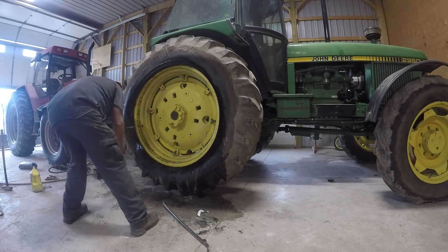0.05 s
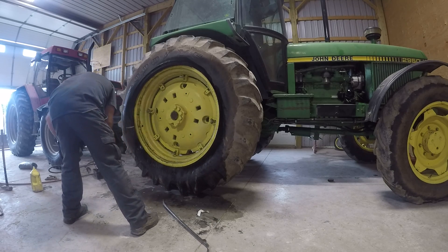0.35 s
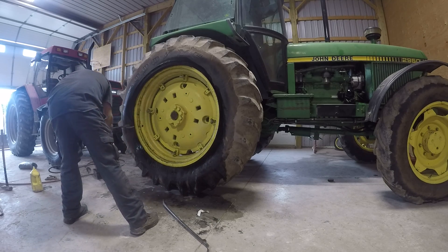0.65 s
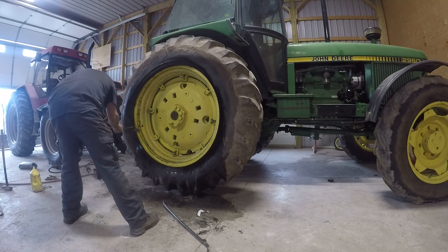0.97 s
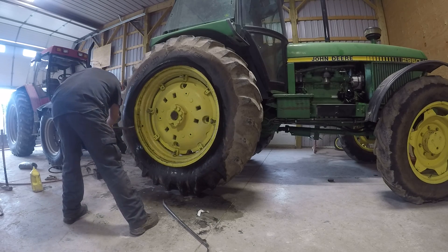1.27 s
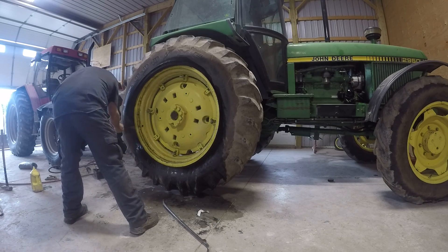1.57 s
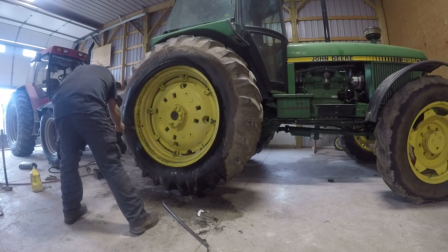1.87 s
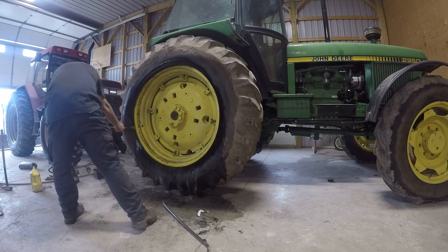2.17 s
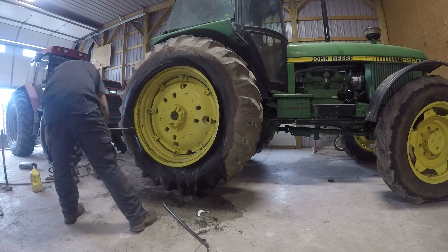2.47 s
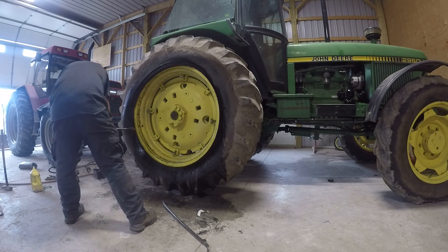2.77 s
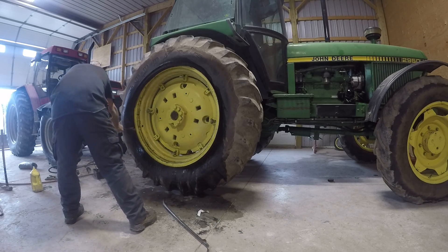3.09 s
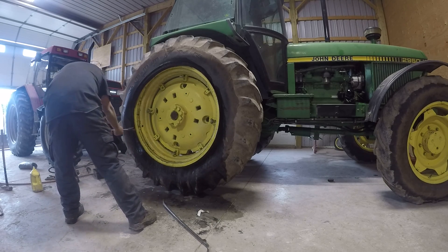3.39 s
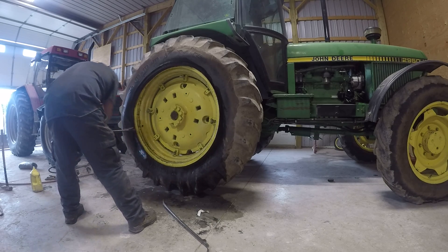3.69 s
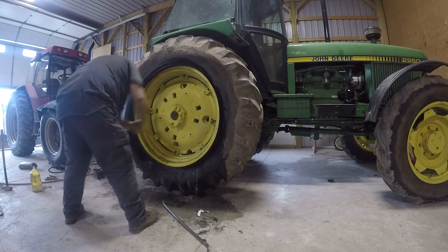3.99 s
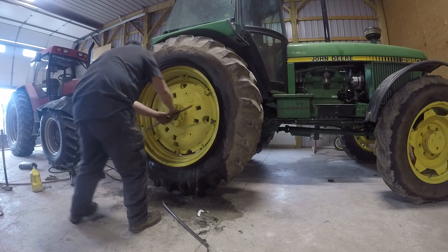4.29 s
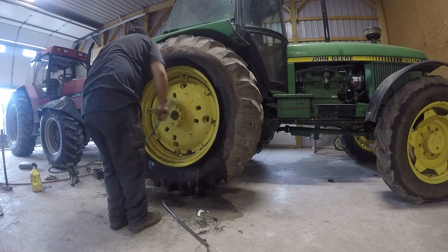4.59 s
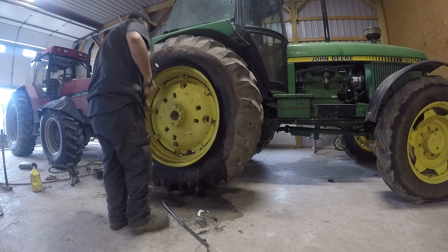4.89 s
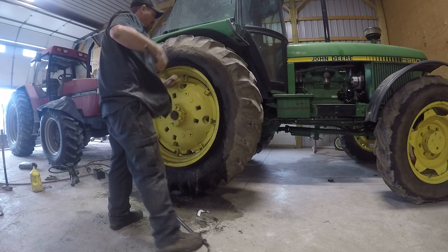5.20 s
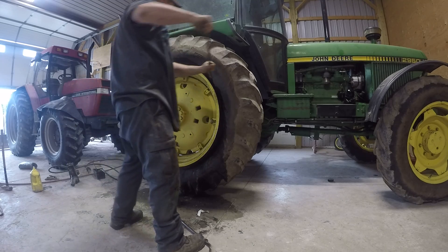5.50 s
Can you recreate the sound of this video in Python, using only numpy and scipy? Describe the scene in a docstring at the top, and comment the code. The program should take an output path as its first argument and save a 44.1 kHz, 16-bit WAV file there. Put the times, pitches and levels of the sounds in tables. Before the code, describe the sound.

In an echoing workshop, a steady hollow hiss, a low motor hum and a soft fluttering tick lie behind work on a tractor wheel. One microphone picks up three short clanks of a steel bar on the rim, each leaving a faint ring. The bar then touches and drags lightly along the metal, comes loose with a clear ringing note, and gives a final small clink.

```python
"""One microphone in a sheet-metal workshop, a steel bar at work on a tractor's wheel rim.
The bar knocks and rings; the tyre damps the rim, so each knock is a short clank the hall carries on.
Further back, a hollow hiss and a low motor hum run throughout, with a soft electrical ticking.
More knocks come near 0.9 s and 1.5 s, then light clinks and scrapes from 2 s on.
At 4.3 s the bar comes free and rings out, and a last clink and faint scrapes follow."""
import sys
import numpy as np
from scipy import signal
from scipy.fft import rfft, irfft
from scipy.io import wavfile
from scipy.ndimage import uniform_filter1d

SR = 44100
rng = np.random.default_rng(int(sys.argv[2]) if len(sys.argv) > 2 else 0)


def master(y):
    """Save y as 16-bit WAV."""
    cut = np.clip(np.atleast_2d(y).T, -1, 1)
    pcm = np.round(cut * 32767)  # scale
    wavfile.write(sys.argv[1], SR, pcm.astype(np.int16))


N = 249165
T = np.arange(N) / SR
HZ = np.fft.rfftfreq(N, 1 / SR)

# the rim's strong modes: pitch_hz, width_hz, lift_db
RIM_MODES = [(160, 28, 15.5), (236, 15, 17), (555, 28, 12.5), (650, 14, 21.5), (993, 46, 15),
             (1270, 25, 12), (1553, 51, 16.5), (2200, 120, 8.5), (2550, 51, 13), (2590, 7.8, 8.5),
             (2732, 47, 10), (2894, 22, 8), (3230, 23, 0), (3234, 72, 10.5), (3350, 72, 8), (3690, 230, 5),
             (4430, 140, 7.5), (4830, 130, 9), (4980, 57, 9), (4960, 70, 2), (5930, 80, 5), (6170, 31, -27),
             (6740, 44, 10.5), (6680, 100, 10), (8450, 73, -28), (9560, 51, 10), (12300, 91, 7)]
# the dense weak modes between them: frequency_hz, relative_db
RIM_SPECTRUM = [(40, -24), (130, -17), (250, -17.5), (420, -16.5), (800, -7.5), (1400, -4), (2300, 4),
                (3400, -0.5), (4100, -6), (5500, -9), (7000, -16), (7500, -22), (11000, -33.5),
                (15500, -43)]
# the hall's reverberation time: frequency_hz, t60_s
HALL_DECAY = [(100, 0.84), (500, 1.29), (1200, 1.11), (2500, 1.135), (4000, 0.97), (7000, 0.93),
              (11000, 0.82), (16000, 1)]
# the low rumble of the motor and of the shaken wheel: frequency_hz, relative_db
RUMBLE_SPECTRUM = [(10, -21), (30, 10.5), (60, 5), (110, -4), (180, -6), (215, -3), (248, -7.5), (275, -5),
                   (350, -13), (500, -18.5), (1000, -89)]


def amp(db):
    """Decibels to gain."""
    return 10 ** (np.asarray(db) / 20)


def unit_rms(x):
    """Scales to rms 1."""
    return x / np.sqrt(np.mean(abs(x) ** 2) + 1e-20)


def curve_at(points, hz):
    """Reads a table on a log-frequency axis."""
    point_hz, value = np.transpose(points)
    return np.interp(np.log(hz + 1), np.log(point_hz + 1), value)


def add(mix, start_s, sound):
    """Mixes a sound in at start_s, which may lie before zero."""
    at = round(start_s * SR)
    sound = sound[max(-at, 0):]
    part = mix[max(at, 0):][:len(sound)]
    part += sound[:len(part)]


def resonant_gain(spectrum, modes, hz):
    """Gain of a broad spectrum with resonances standing out of it."""
    lift = sum((amp(lift_db) ** 2 - 1) / (1 + (2 * (hz - pitch_hz) / width_hz) ** 2) ** 1.05
               for pitch_hz, width_hz, lift_db in modes)
    return amp(curve_at(spectrum, hz)) * np.sqrt(np.maximum(1 + lift, 0.1))


def noise(gain):
    """Steady noise of rms 1, coloured by a gain curve."""
    return unit_rms(irfft(rfft(rng.standard_normal(N)) * gain, N))


def drift(rate_hz):
    """Slow random motion of rms 1."""
    return noise(np.exp(-(HZ / rate_hz) ** 2))


def minimum_phase(gain):
    """The minimum-phase impulse response of a gain curve."""
    log_gain = np.log(np.maximum(np.r_[gain, gain[-2:0:-1]], 1e-5))
    return np.fft.ifft(np.exp(np.conj(signal.hilbert(log_gain)))).real


def bar_ring(beat_hz=16, strike_rise_s=0.0047, linger_rise_s=0.0092):
    """The bar rings in clean modes; the hall holds each one on, beating as the bar is swung."""
    # jolts to the bar, the last as it slips off the rim: start_s, gain_db
    jolts = [(-0.08, -3.5), (1.485, -11.5), (4.308, -0.5)]
    # the free bar's modes: pitch_hz, strike_db, t60_s, linger_db
    bar_modes = [(1272, -42.5, 0.38, -52), (1550, -44, 0.49, -50), (1703, -32.5, 0.25, -44),
                 (2024, -50, 0.39, -46), (2356, -29.5, 0.3, -38), (2746, -36, 0.26, -60),
                 (3150, -38, .25, -43), (3776, -34, 0.75, -37.5), (3920, -44, 0.43, -38),
                 (4452, -36, 0.12, -56), (4856, -43, .25, -49), (5845, -25, 0.11, -46),
                 (6923, -38, 0.2, -50.5), (7570, -60, .2, -62), (8150, -44, 0.13, -68),
                 (9388, -56, 0.27, -63), (11210, -45, .13, -66)]
    t, out = np.arange(SR) / SR, np.zeros(N)
    coarse_t = t[::20]
    for start_s, gain_db in jolts:
        for hz, strike_db, t60_s, linger_db in bar_modes:
            strike = amp(strike_db - 60 * t / t60_s) * (1 - np.exp(-t / strike_rise_s))
            linger = amp(linger_db - 60 * t / curve_at(HALL_DECAY, hz))
            linger *= 1 - np.exp(-t / linger_rise_s)
            detune, phase = np.hsplit(rng.standard_normal((12, 2)), 2)  # twelve echo paths
            paths = np.exp(2j * np.pi * (beat_hz * detune * coarse_t + phase))
            echoes = np.interp(t, coarse_t, paths.sum(0))
            echoes /= np.sqrt(abs(echoes) + 0.1)  # keeps the beats shallow
            echoes /= np.sqrt(np.mean(abs(echoes[:SR // 5]) ** 2))
            mode = (strike + linger * echoes) * np.exp(2j * np.pi * hz * t)
            add(out, start_s, amp(gain_db) * mode.imag)
    return out


def knocks(spot_damping=0.077, spot_db=9.5, crack_db=-26):
    """Blows of the bar on the rim, some dull and some bright, each with a short crack."""
    # bar on rim: start_s, level_db, bass_db, treble_db, clatter_t60_s, mode_share (0-1),
    # spot_low_hz, spot_high_hz (the pitches that the struck spot favours)
    blows = [(-0.06, -14, -1.5, 0, 0.039, 0.3, 1730, 2160), (-0.03, -23.5, 0.5, 7, 0.083, 0.45, 684, 3650),
             (0.8697, -25, -2, -5.5, 0.034, 0.15, 3740, 3950),
             (0.874, -27, 5, -14, 0.072, 0.51, 1290, 2050), (0.888, -33.5, 13, -21, 0.062, 0.71, 580, 615),
             (0.9623, -33, 2, 4.5, 0.035, 0.53, 4150, 6300), (0.975, -32, 1.5, -14, 0.16, 0.47, 1510, 1830),
             (0.985, -31.5, -1, 3, 0.065, 0.22, 4000, 4890),
             (1.475, -25, -12, -3.5, 0.048, 0.71, 1220, 6460), (1.479, -25.5, -10, 0, 0.021, 1, 1570, 2500),
             (1.4843, -18, -16.5, 7.5, 0.03, 0.98, 3340, 11500),
             (1.489, -22, 4, -6, 0.16, 0.96, 1330, 3060), (4.3036, -31.5, -3.5, 5, 0.04, 0.42, 4180, 5900),
             (4.309, -29, 0, 3.5, 0.083, 0.32, 1074, 2400)]
    out = np.zeros(N)
    for start_s, level_db, bass_db, treble_db, clatter_t60_s, mode_share, *spot_hz in blows:
        spot_modes = [(hz, spot_damping * hz, spot_db) for hz in spot_hz]
        add(out, start_s, rim_clank(level_db, bass_db, treble_db, clatter_t60_s, mode_share, spot_modes))
        add(out, start_s, crack(level_db + treble_db + crack_db))
    return out


def rim_clank(level_db, bass_db, treble_db, clatter_t60_s, mode_share, spot_modes):
    """One contact rings the damped rim, coloured by the struck spot, and the hall carries it on."""
    hz = np.fft.rfftfreq(8192, 1 / SR)
    bass_shelf = 1 / (1 + (hz / 1400) ** 6)
    treble_shelf = 1 - 1 / (1 + (hz / 4400) ** 14)
    # countless narrow modes of the steel ripple the treble
    ripple = unit_rms(uniform_filter1d(rng.standard_normal(len(hz)), size=10))
    colour_db = bass_db * bass_shelf + treble_db * treble_shelf + 5 * ripple * hz / (hz + 3500)
    modes = [(pitch_hz, width_hz, lift_db * mode_share) for pitch_hz, width_hz, lift_db in RIM_MODES]
    rim = resonant_gain(RIM_SPECTRUM, modes, hz)
    spot = resonant_gain([(1, 0)], spot_modes, hz)  # peaks on a flat spectrum
    ring = minimum_phase(rim * spot * amp(colour_db))
    # a longer clatter shakes more of the wheel and fills the hall more: 3 dB per doubling
    hall_db = -5.5 + 3 * np.log2(clatter_t60_s / 0.055)
    paths = amp(hall_db) * hall_tail()
    add(paths, 0, clatter(clatter_t60_s))
    gain = amp(level_db) * np.sqrt(0.01 * SR)  # the level is the blow's energy spread over 10 ms
    return gain * signal.fftconvolve(paths, ring / np.linalg.norm(ring))


def crack(level_db, t60_s=0.012, low_hz=5500):
    """The snap of steel on steel, before the rim rings: a few milliseconds of treble."""
    t = np.arange(SR // 20) / SR
    highpass = signal.butter(2, low_hz, "high", fs=SR, output="sos")
    snap = signal.sosfilt(highpass, rng.standard_normal(len(t)))
    return snap * amp(level_db - 60 * t / t60_s)


def clatter(t60_s, spread_s=0.0014, size=8192):
    """A contact and its close bounces between wheel, tyre and floor: a colourless burst."""
    t = np.arange(size) / SR
    rise = 1 - 0.52 * np.exp(-t / spread_s)  # the blow takes a moment to spread round the rim
    bounces = rng.standard_normal(size) * rise * amp(-60 * t / t60_s)
    power = uniform_filter1d(abs(rfft(bounces)) ** 2, size=61)
    whitener = minimum_phase(1 / np.sqrt(power))
    return signal.fftconvolve(bounces, whitener)[:size]


def hall_tail(build_s=0.018):
    """The workshop's diffuse echoes, of energy 1; the midrange lasts longest."""
    hz, frame_s, spectra = signal.stft(rng.standard_normal(2 * SR), SR, nperseg=256)
    decay = amp(-60 * frame_s / curve_at(HALL_DECAY, hz)[:, None])
    tail = signal.istft(spectra * decay, SR, nperseg=256)[1]
    t = np.arange(len(tail)) / SR
    tail *= 1 - np.exp(-(t / build_s) ** 2)
    return tail / np.linalg.norm(tail)


def wheel_drone(pitch_hz=145, t60_s=1.76, rise_s=0.0062, shudder_db=-6):
    """The wheel's lowest mode, which the tyre hardly damps, and a low shudder that dies with it."""
    # blows and shoves that shake the whole wheel: start_s, level_db
    shoves = [(-0.06, -46.5), (1.483, -58), (3.80, -56), (4.305, -56)]
    t, out = np.arange(2 * SR) / SR, np.zeros(N)
    for start_s, level_db in shoves:
        shudder = amp(shudder_db) * noise(amp(curve_at(RUMBLE_SPECTRUM, HZ)))[:len(t)]
        envelope = amp(level_db - 60 * t / t60_s) * (1 - np.exp(-t / rise_s))
        add(out, start_s, envelope * (np.sin(2 * np.pi * pitch_hz * t) + shudder))
    return out


def machinery(hiss_db=-50.5, rumble_db=-57):
    """Further back, a hollow hiss as of air in a hose, over a motor's rumble and wavering hum."""
    # the broad shape of the hiss: frequency_hz, relative_db
    hiss_spectrum = [(300, -15.5), (500, -9), (1200, -4), (1700, 4.5), (2500, 5), (3000, 2.5), (3800, 5),
                     (4100, -5), (4700, -5.5), (5500, -8.5), (6600, -13), (7200, -14), (10000, -20),
                     (15000, -21.5)]
    # its hollow resonances: pitch_hz, width_hz, lift_db
    hiss_modes = [(647, 270, 4), (998, 72, 8.6), (1550, 12, 4.7), (2114, 28, 15.6), (2251, 87, 11.9),
                  (3232, 60, 12.25), (3715, 11, 9.3), (4350, 38, 9.3), (4640, 80, 5.5), (5670, 51, 6.9),
                  (6480, 80, 6.2)]
    # the motor's tones: pitch_hz, level_db
    hum_tones = [(152, -72.5), (113, -69.5), (244.4, -70.5)]
    hiss = noise(resonant_gain(hiss_spectrum, hiss_modes, HZ)) * amp(hiss_db + 0.5 * drift(2.6))
    rumble = noise(amp(curve_at(RUMBLE_SPECTRUM, HZ))) * amp(rumble_db)
    hum = np.zeros(N)
    for pitch_hz, level_db in hum_tones:
        peak = np.sqrt(2) * amp(level_db + 2 * drift(4.0))
        hum += peak * np.sin(2 * np.pi * pitch_hz * T + 0.77 * drift(1.4))
    return hiss + rumble + hum


def ticking(first_s=0.0792, period_s=0.1024, pulse_db=-39.5, decay_s=0.0065, band_hz=(33, 250)):
    """Short, evenly spaced electrical pulses, rounded into a soft low flutter."""
    t, pulses = np.arange(SR // 20) / SR, np.zeros(N)
    for start_s in np.arange(first_s, T[-1], period_s):
        add(pulses, start_s, -np.exp(-t / decay_s) * amp(pulse_db + rng.standard_normal()))
    bandpass = signal.butter(2, band_hz, "band", fs=SR, output="sos")
    return signal.sosfilt(bandpass, pulses)


def bumps():
    """Dull, low pushes that die within a few cycles."""
    # each push: start_s, level_db, pitch_hz, length_cycles
    pushes = [(0.283, -40.5, 38.4, 1.1), (1.495, -41, 137, 2.4), (4.293, -38, 92, 1.26)]
    t, out = np.arange(SR // 4) / SR, np.zeros(N)
    for start_s, level_db, pitch_hz, length_cycles in pushes:
        envelope = amp(level_db) * np.exp(-(t * pitch_hz / length_cycles) ** 2)
        add(out, start_s, -envelope * np.sin(2 * np.pi * pitch_hz * t))
    return out


def clinks():
    """The bar touches the rim lightly as it is moved, always with the same pitches."""
    # light touches: start_s, level_db, clatter_t60_s
    touches = [(2.021, -41.5, 0.054), (3.135, -45, .045), (3.905, -42, 0.13), (3.944, -49, .12),
               (4.290, -41, 0.082), (4.571, -42.5, 0.16)]
    # the clink's resonances: pitch_hz, width_hz, lift_db
    clink_modes = [(1850, 70, 14), (2700, 80, 9), (4580, 120, 15), (6250, 150, 9)]
    out = np.zeros(N)
    for start_s, level_db, clatter_t60_s in touches:
        clink = rim_clank(level_db, bass_db=-0.5, treble_db=-5, clatter_t60_s=clatter_t60_s,
                          mode_share=0.15, spot_modes=clink_modes)
        add(out, start_s, clink)
    return out


def scrape(slips_per_s=900, groan_hz=630, groan_width_hz=120, groan_db=20, grit_db=3):
    """Tiny slips of the dragged bar excite the rim: a low groan under gritty treble."""
    # drags along the rim, each swelling and fading in one arch: start_s, length_s, level_db
    strokes = [(2.412, 0.38, -55), (3.722, 0.46, -53.5), (4.07, 0.25, -58.5), (4.4, 0.3, -68),
               (5.224, 0.41, -72)]
    slips = rng.standard_normal(N) * (rng.random(N) < slips_per_s / SR)
    rim = resonant_gain(RIM_SPECTRUM, RIM_MODES + [(groan_hz, groan_width_hz, groan_db)], HZ)
    rim *= amp(grit_db * HZ ** 4 / (HZ ** 4 + 4000 ** 4))  # shelf above 4 kHz
    envelope = sum(amp(level_db) * np.sin(np.pi * np.clip((T - start_s) / length_s, 0, 1)) ** 2
                   for start_s, length_s, level_db in strokes)
    return unit_rms(irfft(rfft(slips) * rim, N)) * envelope


def scene():
    """The work on the wheel and the workshop behind it, at one microphone."""
    work = knocks() + clinks() + bar_ring() + wheel_drone() + scrape() + bumps()
    return (work + ticking() + machinery())[None]


def record(dry):
    """The recorder's band limit: a steep cut above 15.3 kHz."""
    lowpass = signal.firwin(511, 15300, window=("kaiser", 9), fs=SR)
    return signal.oaconvolve(dry, lowpass[None], "same")


dry = scene()
out = record(dry)
master(out)
```